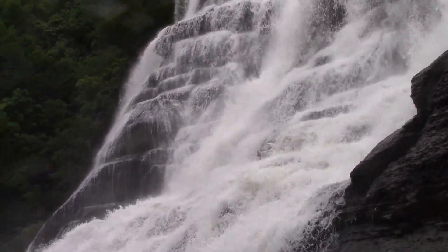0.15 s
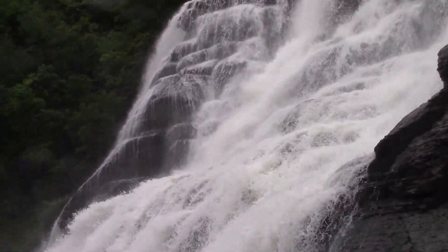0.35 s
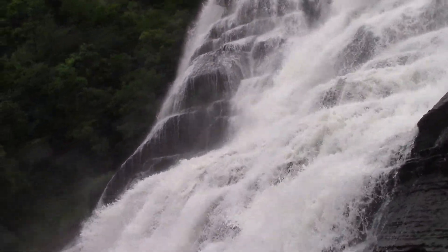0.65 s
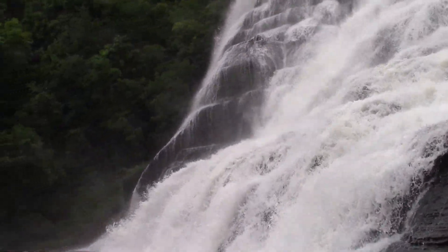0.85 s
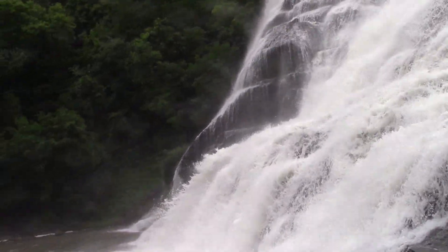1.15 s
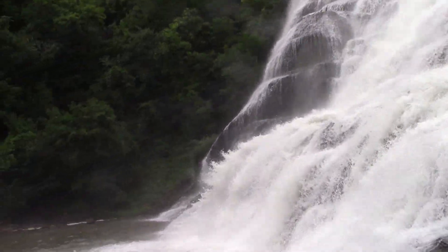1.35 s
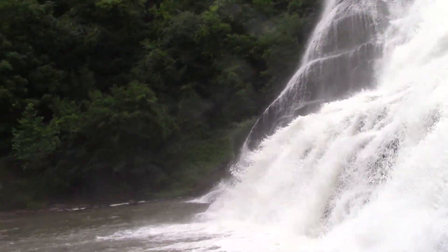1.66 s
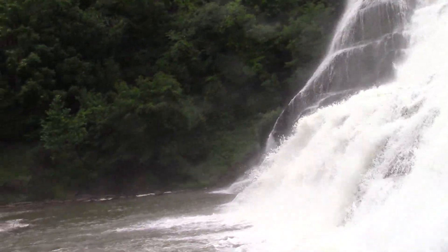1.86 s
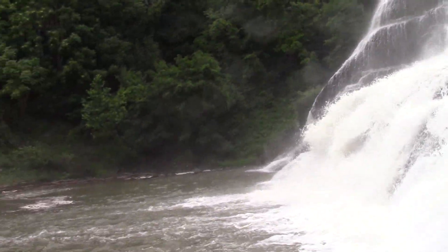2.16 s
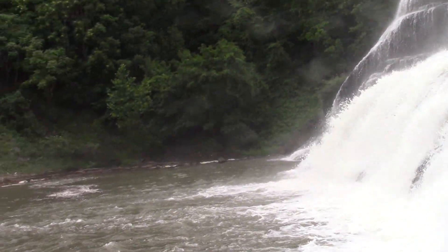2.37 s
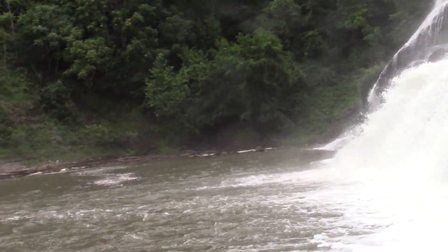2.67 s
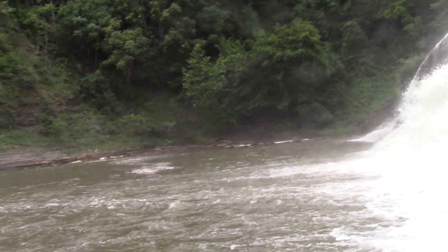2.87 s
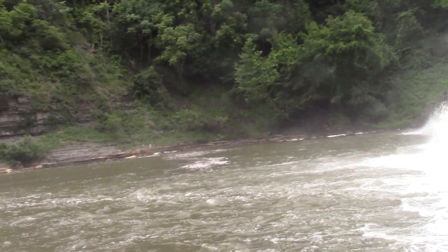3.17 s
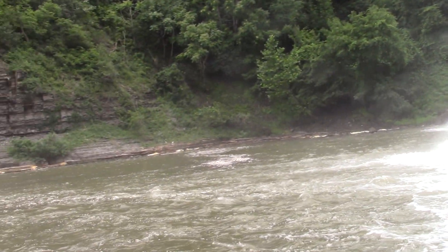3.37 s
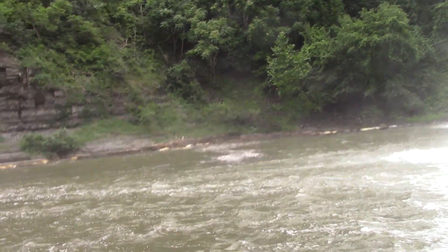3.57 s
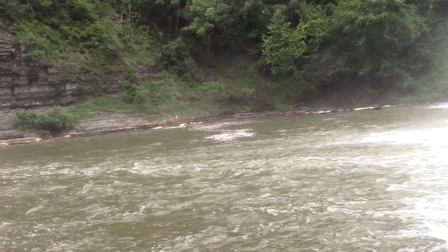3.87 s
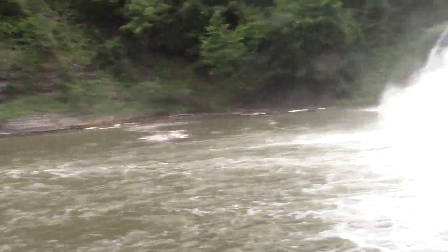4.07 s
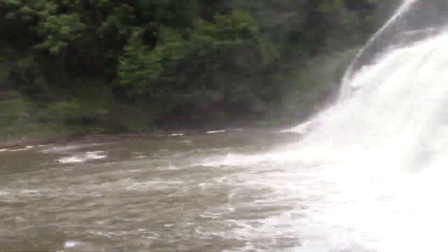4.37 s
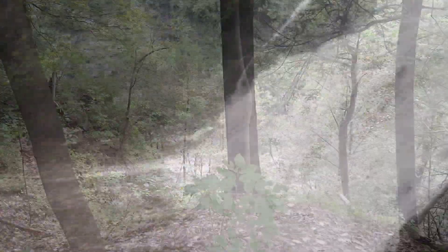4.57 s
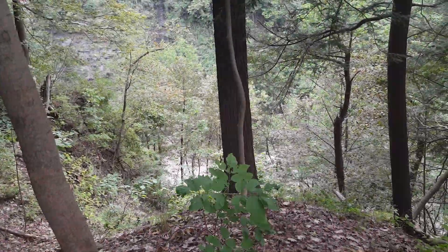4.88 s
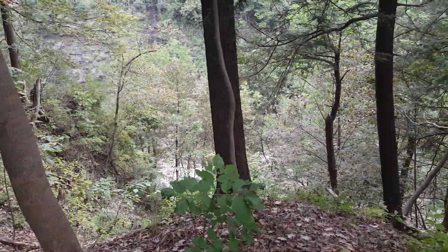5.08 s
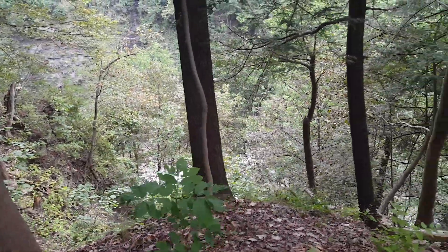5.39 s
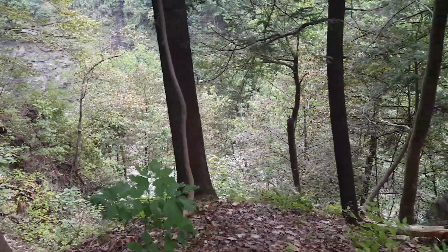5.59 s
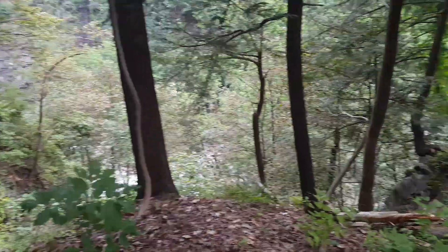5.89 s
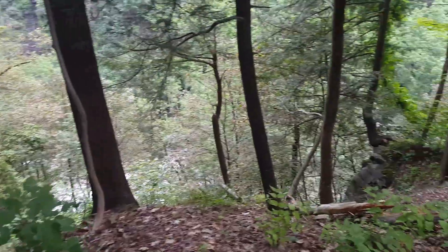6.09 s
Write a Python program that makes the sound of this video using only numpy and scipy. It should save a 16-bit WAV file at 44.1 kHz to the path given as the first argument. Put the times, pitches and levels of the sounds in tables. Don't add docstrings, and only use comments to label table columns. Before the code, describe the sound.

A close waterfall roars brightly with buffeting wind on the microphone, turns thinner, fades to brief silence, then a duller distant fall swells.

```python
import sys
import numpy as np
from scipy import signal
from scipy.fft import rfft, irfft
from scipy.io import wavfile

SR = 44100
rng = np.random.default_rng(int(sys.argv[2]) if len(sys.argv) > 2 else 0)


def store_wav(level_fs):
    pcm = np.round(np.clip(np.atleast_2d(level_fs), -1, 1) * 32767)
    wavfile.write(sys.argv[1], SR, pcm.T.astype(np.int16))


def gain_from_decibels(decibels):
    exponent = np.asarray(decibels, float) / 20
    return 10 ** exponent


N = 275184
STEP = 64
CLOCK = np.arange(N // STEP + 2) * STEP / SR
HZ = np.maximum(np.fft.rfftfreq(N, 1 / SR), 1)

# (time [s], spray level [dB], wind filter depth [0-1])
RIDE = [(0, -23.5, 0.38), (.5, -24.5, 0.26), (1.45, -24.5, 0.07), (1.98, -25.5, 0.1), (2.1, -27.5, 0.06),
        (2.3, -28.5, 0.06), (2.62, -28.5, 0.1), (2.85, -29, 0.25), (2.95, -27.5, 0.7), (3.15, -28.2, 1),
        (3.45, -26.5, .7), (3.84, -27, .55), (4.02, -28, 0.97), (4.6, -28, 0.9)]
# (time [s], turned away [0-1], left over right [dB], left port lag [microseconds])
CAMERA = [(0, 0.1, -0.5, 0.81), (1, 0.06, -0.5, 4.7), (2, 0.07, -2, 3.6), (2.5, 0, -2.5, 4.4),
          (2.7, 0.17, -1, 16), (3, 0.78, 1, 12), (3.6, 0.84, 2, 6.5), (4.64, 0.8, 2.5, 10.6)]
# (frequency [Hz], density [dB per Hz])
FACING_COLOUR = [(15, -68), (25, -49), (119, -5.5), (183, 0.5), (314, 0), (446, -5), (616, -5), (764, -9),
                 (1310, -8), (2070, -12.5), (3850, -13), (5460, -17.5), (7750, -14), (11000, -18.5),
                 (15600, -31)]
# (frequency [Hz], density [dB per Hz])
AWAY_COLOUR = [(15, -73.5), (25, -49), (75, -27), (199, -7.5), (390, -0.5), (423, -3.5), (785, -7.5),
               (1350, -4), (2180, -5), (2860, -2), (5610, -6.5), (7750, -5.5), (10100, -10.5),
               (14400, -19.5), (15600, -28.5)]
# (frequency [Hz], level facing [dB], level turned away [dB])
SCATTER = [(300, -41, -65.5), (800, -20.5, -43), (1210, -31.5, -68.5), (2010, -16.5, -64.5),
           (3000, -18.5, -55), (4500, -17, -11), (6980, -19.5, -12.5), (10000, -24.5, -5.5),
           (14000, -12, 4.5)]
# (time [s], lift [dB])
THUDS = [
    (.33, 6.5),
    (.58, 8),
    (.85, 3),
    (1.67, 12.5),
    (1.82, 11),
    (2.25, 9),
    (3.84, 5),
]
# (start [s], hold [s], level [dB])
GUSTS = [(.21, .02, -54), (0.366, 0.026, -39), (0.523, 0.12, -46), (.72, 0.044, -50), (.87, .02, -60),
         (1.007, 0.088, -38), (1.25, .2, -57), (1.52, .1, -43.5), (1.653, 0.38, -36.5), (2.1, .15, -44),
         (2.318, 0.12, -38), (2.528, 0.074, -33)]
# (frequency [Hz], density [dB per Hz])
BUFFET_COLOUR = [(18, -66), (30, -37), (64, -29), (105, -12.5), (189, 0), (248, -2), (278, -2), (501, -5.5),
                 (571, -13.5), (817, -19), (930, -24.5), (1210, -55), (2050, -120)]
# (time [s], level [dB])
SLAPS = [
    (.39, -26.5),
    (1.66, -26.5),
    (1.995, -25),
    (2.44, -28),
    (2.525, -29.5),
    (2.6, -21),
    (2.751, -28),
]
# (frequency [Hz], density [dB per Hz])
FAR_LEFT_COLOUR = [(25, -32), (60, -7), (150, -2), (300, -2.5), (480, -10), (750, -7), (1300, -9.5),
                   (2200, -9.5), (3700, -16.5), (5800, -35), (8000, -32), (10000, -54), (11500, -52),
                   (15700, -53)]
# (frequency [Hz], density [dB per Hz])
FAR_RIGHT_COLOUR = [(25, -24), (60, -7.5), (150, -2.5), (300, -3), (480, -12), (750, -8), (1400, -15),
                    (3300, -15.5), (4600, -10.5), (7100, -24.5), (8100, -23), (9700, -45.5), (11800, -46),
                    (15700, -56)]
# (frequency [Hz], left-right likeness [-1 to 1])
FAR_LIKENESS = [(60, 0.99), (130, 0.97), (290, 0.96), (640, 0.68), (1410, 0.16), (3100, 0.62),
                (6820, -0.14), (15000, -0.03)]
# (time [s], tick level [dB], thump level [dB], left over right [dB])
TICKS = [
    (5.846, -46, -26, -12),
    (6.018, -70, -26, -3),
    (6.1175, -54, -42, -8),
    (6.2365, -52, -42, -8),
]
SILENCE_S = 4.645, 4.7225


def at_hz(points, hz, order=1):
    table = np.array(points)
    return np.interp(np.log(hz), np.log(table[:, 0]), table[:, order])


def slow(rows):
    s, *columns = np.transpose(rows)
    return [np.interp(CLOCK, s, column) for column in columns]


def fast(control):
    return np.interp(np.arange(N) / STEP, np.arange(len(control)), control)


def drift(rate_hz):
    r = np.exp(-2 * np.pi * rate_hz * STEP / SR)
    noise = rng.standard_normal(N // STEP + 2002)
    wander = signal.lfilter([1], [1, -2 * r, r * r], noise)[2000:]
    return wander / np.std(wander)


def coloured(colour, count):
    return rfft(rng.standard_normal((count, N))) * gain_from_decibels(at_hz(colour, HZ))


def band(spectra, centre_hz):
    half_octaves = np.clip(2 * np.log2(HZ / centre_hz), -1, 1)
    return irfft(spectra * np.cos(np.pi / 2 * half_octaves) ** 2, N)


def power_db(colour, low_hz, high_hz):
    hz = np.arange(low_hz, high_hz)
    return 10 * np.log10(np.sum(gain_from_decibels(at_hz(colour, hz)) ** 2) * 2 / SR)


def fade_db(silent_s, full_s, power):
    height = np.clip((CLOCK - silent_s) / (full_s - silent_s), 1e-4, 1)
    return 20 * power * np.log10(height)


def near_fall(surge_db, patchy_db):
    levels_db = near_layers_db()
    turn, pan_db, lag_us = slow(CAMERA)
    cut = np.clip(slow(RIDE)[1] + 0.34 * calm(), 0, 1)
    zones = [(110, 600, cut), (900, 5000, turn), (7000, 14000, turn), (35, 100, cut)]
    trims = []
    for level_db, (low_hz, high_hz, mix) in zip(levels_db, zones):
        facing_db = power_db(FACING_COLOUR, low_hz, high_hz)
        away_db = power_db(AWAY_COLOUR, low_hz, high_hz)
        trims.append(level_db - facing_db * (1 - mix) - away_db * mix)
    noise = coloured(FACING_COLOUR, count=2)
    surge = drift(3.0)
    shared = drift(6.0)
    direct, scattered = 0, 0
    for hz in 22 * 2 ** np.arange(0, 10, .5):
        place = np.interp(np.log(hz), np.log([75, 130, 400, 1000, 4500, 8500]), [-1, 0, 0, 1, 1, 2])
        trim_db = sum(trim * max(0, 1 - abs(place - k)) for k, trim in zip([0, 1, 2, -1], trims))
        mix = np.clip(cut if hz < 700 else turn, 0, 1)
        shared = 0.59 * shared + 0.8 * drift(5.8)
        recolour_db = mix * (at_hz(AWAY_COLOUR, hz) - at_hz(FACING_COLOUR, hz))
        gain_db = trim_db + recolour_db + surge_db * surge + patchy_db * shared
        apart_db = at_hz(SCATTER, hz) * (1 - mix) + at_hz(SCATTER, hz, order=2) * mix
        mid, side = band(noise, hz)
        direct = direct + mid * fast(gain_from_decibels(gain_db))
        scattered = scattered + side * fast(gain_from_decibels(gain_db + apart_db))
    bright = irfft(rfft(direct) / (1 + (4300 / HZ) ** 12), N)
    panned = bright * np.tanh(fast(pan_db) * np.log(10) / 20 / 2)
    lagged = np.gradient(bright) * fast(lag_us) * SR / 1.85e6
    side = scattered + panned - lagged
    return direct + side * [[1], [-1]]


def near_layers_db():
    spray, cut = slow(RIDE)
    turn = slow(CAMERA)[0]
    thud_s = 0.028
    thuds = sum(db * np.exp(-.5 * ((CLOCK - s) / thud_s) ** 2) for s, db in THUDS)
    open_db, shut_db = 1, -11.5
    roar = spray + open_db + cut * (shut_db - open_db)
    facing_db, away_db = -6.5, -4.5
    mist = spray + facing_db + turn * (away_db - facing_db)
    deep_open_db, deep_shut_db, deep_calm_db = -24, -34, -13.0
    deep = spray + deep_open_db + cut * (deep_shut_db - deep_open_db) + deep_calm_db * calm() + thuds
    return roar, spray, mist, deep


def calm():
    start_s, length_s = 2.55, 0.13
    return np.clip((CLOCK - start_s) / length_s, 0, 1)


def splashes(per_s, level_db):
    sizes = gain_from_decibels(4.4 * np.minimum(rng.exponential(1, N), 2.5)) * rng.choice([-1, 1], N)
    hits = sizes * (rng.random(N) < per_s / SR)
    dealt = rng.integers(0, 12, N)
    out = 0
    for k, hz in enumerate(np.geomspace(1000, 9000, 12)):
        r = gain_from_decibels(-60 * hz / (6.0 * SR))
        w = 2 * np.pi * hz / SR
        struck = hits * (dealt == k) + 1e-18
        out = out + signal.lfilter([0, np.sin(w)], [1, -2 * r * np.cos(w), r * r], struck)
    out = signal.sosfilt(signal.butter(4, 800, "high", fs=SR, output="sos"), out)
    return out / np.std(out) * fast(gain_from_decibels(slow(RIDE)[0] + level_db))


def port_wind(lumpy_db, common_db):
    end_s = 2.67
    gust = gain_from_decibels(gusts_db() - power_db(BUFFET_COLOUR, 70, 600) + lumpy_db * drift(25))
    turbulence = irfft(coloured(BUFFET_COLOUR, count=2) * (HZ < 950), N)
    common, opposed = turbulence * fast(gust) * (np.arange(N) < end_s * SR)
    return gain_from_decibels(common_db) * common + opposed * [[1], [-1]]


def gusts_db():
    rise_db_per_s, fall_db_per_s, breeze_db = 301, 299, -71
    gusts = []
    for s, hold, db in GUSTS:
        rise = rise_db_per_s * np.maximum(s - CLOCK, 0)
        fall = fall_db_per_s * np.maximum(CLOCK - s - hold, 0)
        gusts.append(db - rise - fall)
    return np.maximum(np.max(gusts, axis=0), breeze_db)


def wind_slaps(length_s):
    t = np.arange(N) / SR
    swell = sum(gain_from_decibels(db) * np.exp(-.5 * ((t - s) / length_s) ** 2) for s, db in SLAPS)
    puff = irfft(coloured(BUFFET_COLOUR, count=1)[0] / (1 + (HZ / 450) ** 4), N)
    return puff / np.std(puff) * swell


def handling():
    out = np.zeros((2, N))
    t = np.arange(int(0.033 * SR)) / SR
    puffs = rng.standard_normal((len(TICKS), len(t)))
    pitch_hz = 80 + 260 * np.exp(-t / 0.0094)
    swell = np.sin(np.pi * np.sqrt(t / t[-1])) ** 2
    thump = np.sin(2 * np.pi * np.cumsum(pitch_hz) / SR) * swell
    for (s, tick_db, thump_db, pan_db), puff in zip(TICKS, puffs):
        tick = puff * np.exp(-t / .0015)
        blow = gain_from_decibels(tick_db) * tick + gain_from_decibels(thump_db) * thump
        i = round(s * SR)
        out[:, i:i + len(t)] += blow[:N - i] * gain_from_decibels([[pan_db / 2], [-pan_db / 2]])
    return out


def far_fall(patchy_db, trim_db):
    fade_in = fade_db(silent_s=4.717, full_s=5.726, power=1.03)
    rumble_db, hiss_db = fade_in - 29, fade_in - 29.5
    alike = np.clip(at_hz(FAR_LIKENESS, HZ), 0, 1)
    mid, side = rfft(rng.standard_normal((2, N)))
    ports = (np.sqrt(1 + alike) * mid + np.sqrt(1 - alike) * side * [[1], [-1]]) / np.sqrt(2)
    ports = ports * gain_from_decibels([at_hz(FAR_LEFT_COLOUR, HZ), at_hz(FAR_RIGHT_COLOUR, HZ)])
    ports[0] *= np.exp(-2j * np.pi * HZ * 8e-5)
    low = 1 / (1 + (HZ / 580) ** 6)
    rumble_gain_db = rumble_db - power_db(FAR_LEFT_COLOUR, 50, 500) + patchy_db * drift(9.1)
    hiss_gain_db = hiss_db - power_db(FAR_LEFT_COLOUR, 680, 6000) + trim_db + 0.2 * drift(4.3)
    rumble = irfft(ports * low, N) * fast(gain_from_decibels(rumble_gain_db))
    hiss = irfft(ports * (1 - low), N) * fast(gain_from_decibels(hiss_gain_db))
    return rumble + hiss


def scene():
    t = np.arange(N) / SR
    near = near_fall(surge_db=-0.11, patchy_db=0.66)
    near = near + splashes(per_s=910, level_db=-19.5)
    near = near + port_wind(lumpy_db=3.5, common_db=-6.0)
    near = near + wind_slaps(length_s=0.014)
    near = near * fast(gain_from_decibels(fade_db(silent_s=4.676, full_s=3.71, power=2.63)))
    far = handling() + far_fall(patchy_db=0.0, trim_db=3.0)
    silent_from_s, silent_to_s = SILENCE_S
    return near * (t < silent_from_s) + far * (t > silent_to_s)


def band_limit(x):
    return signal.sosfilt(signal.butter(12, 16170, fs=SR, output="sos"), x)


def record(dry):
    rounded = 0.57 * np.tanh(dry / 0.53)
    top_cut = signal.ellip(12, .5, 70, 15750, fs=SR, output="sos")
    return band_limit(signal.sosfilt(top_cut, rounded))


dry = scene()
out = record(dry)
store_wav(out)
```